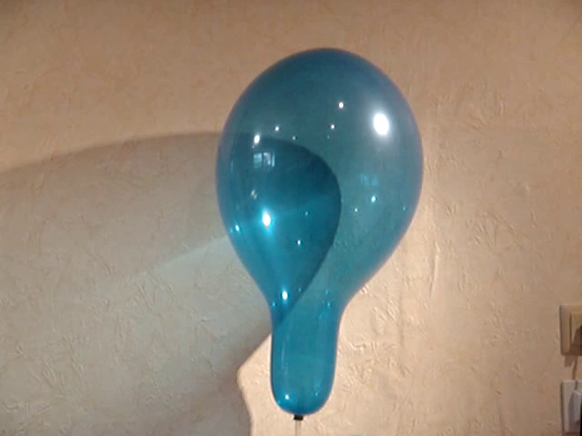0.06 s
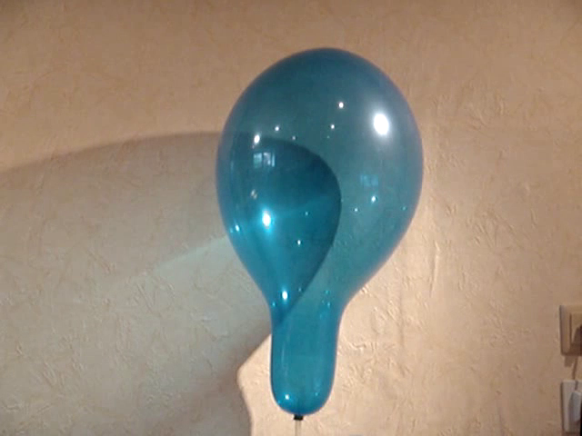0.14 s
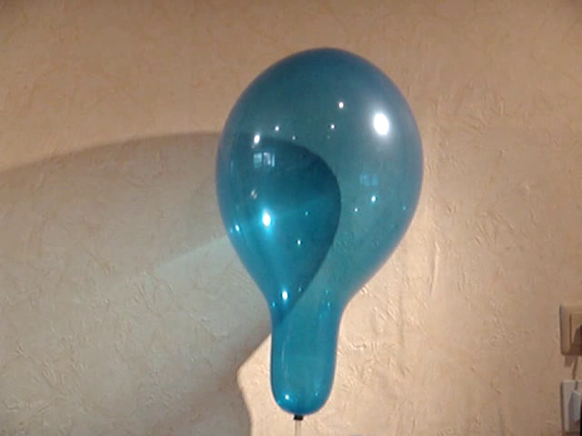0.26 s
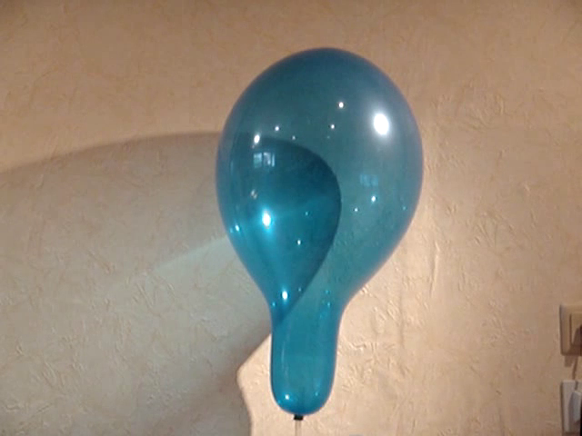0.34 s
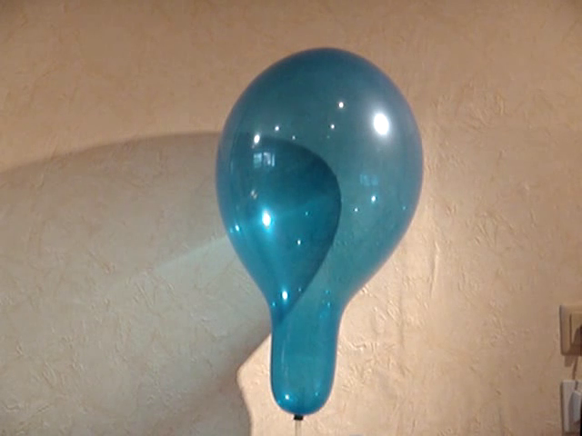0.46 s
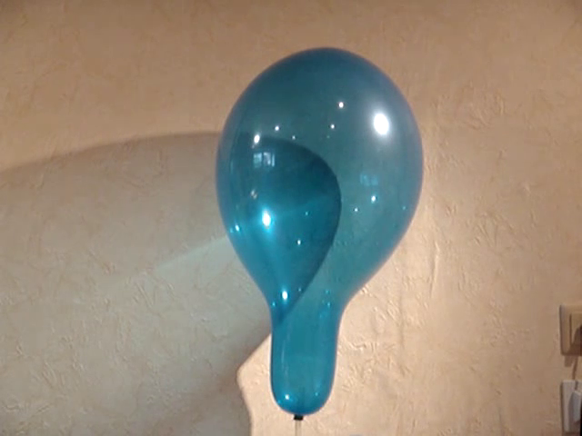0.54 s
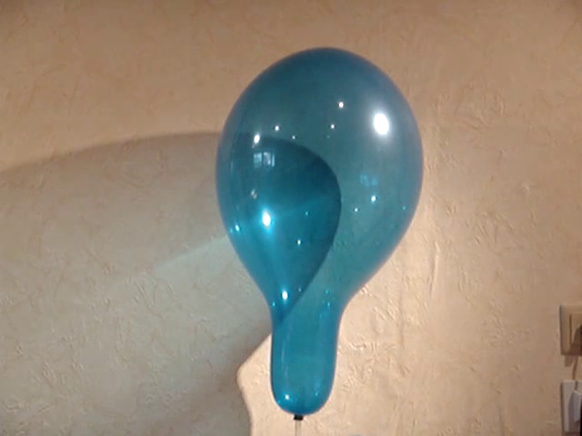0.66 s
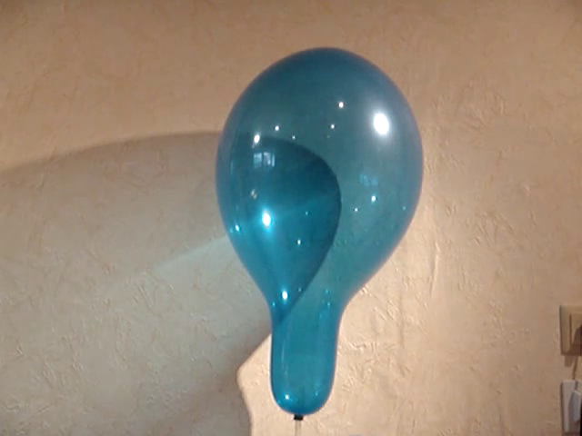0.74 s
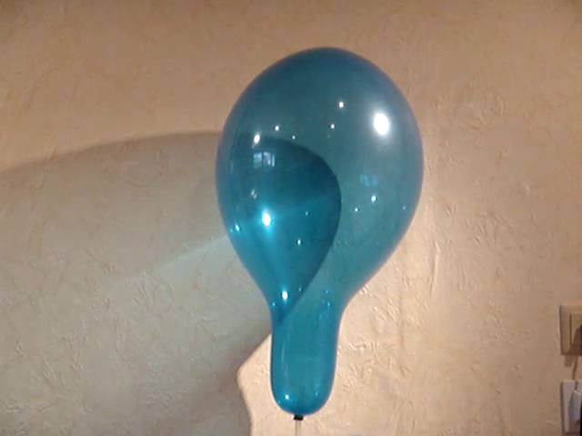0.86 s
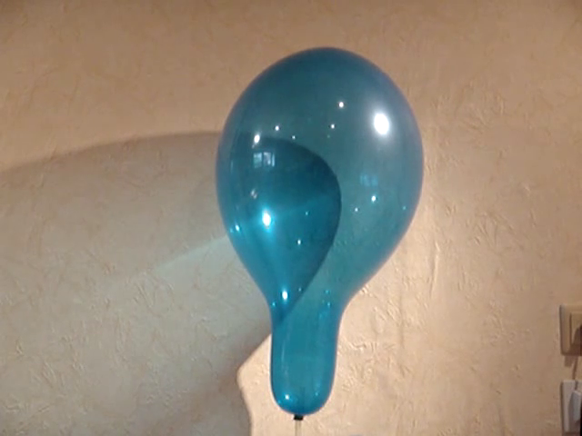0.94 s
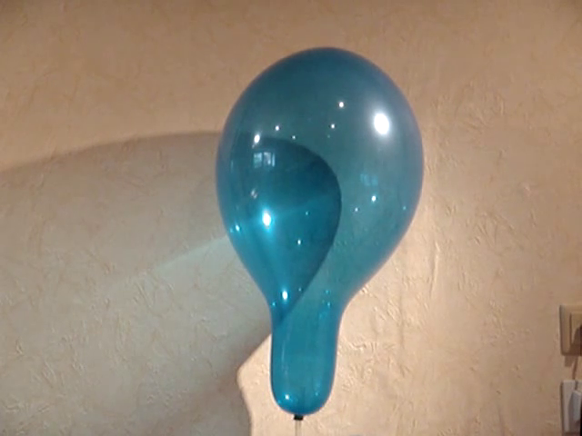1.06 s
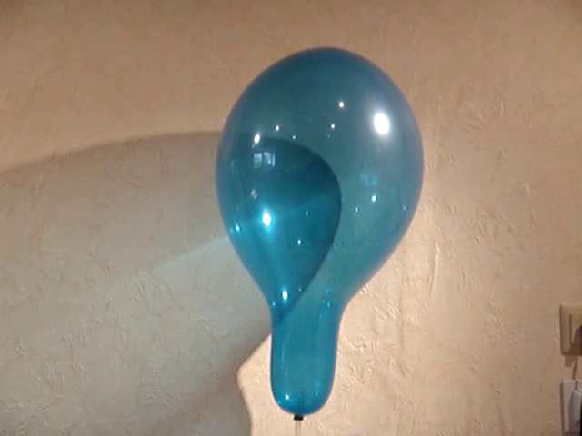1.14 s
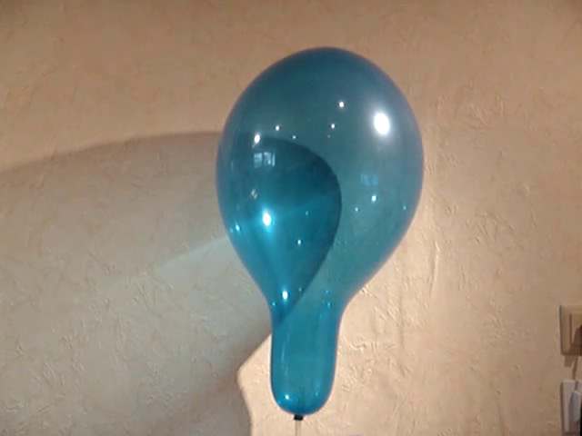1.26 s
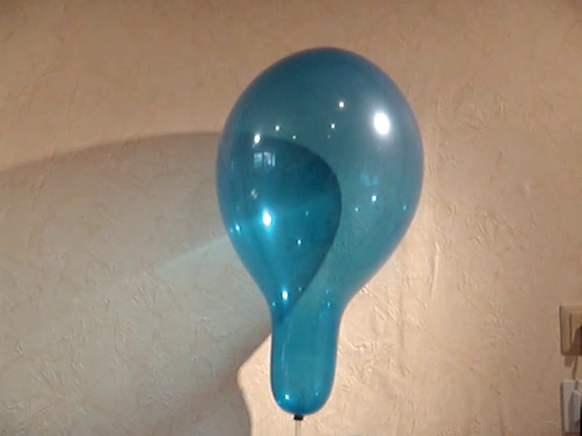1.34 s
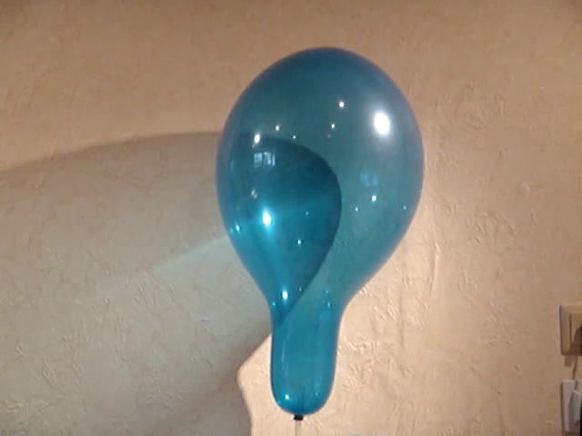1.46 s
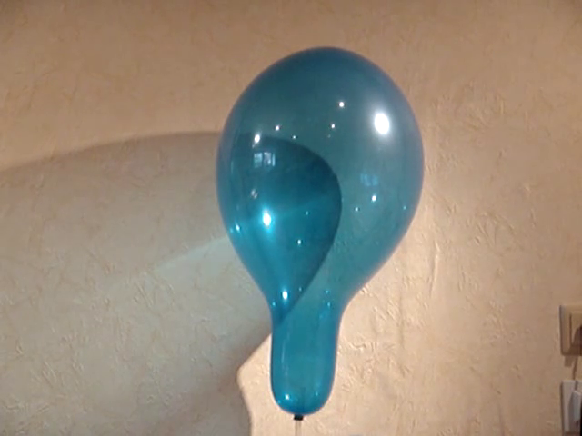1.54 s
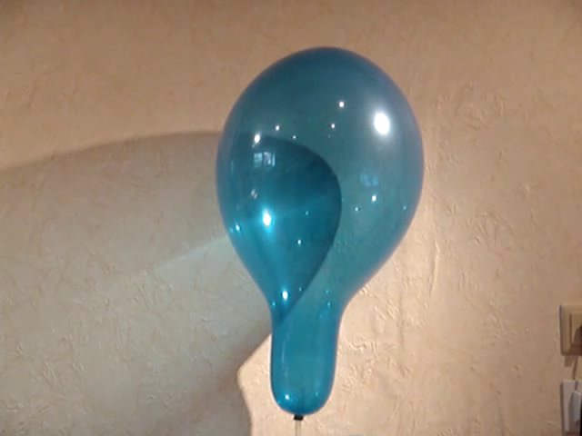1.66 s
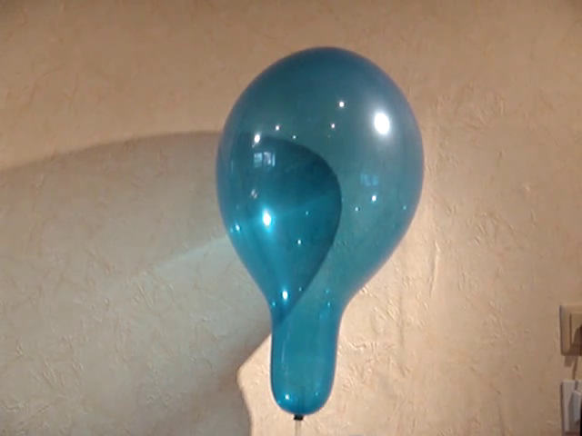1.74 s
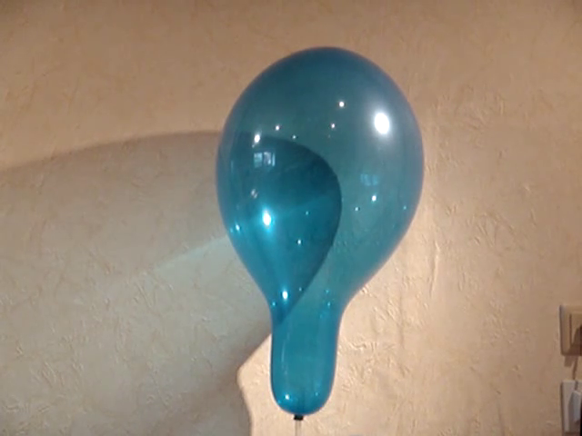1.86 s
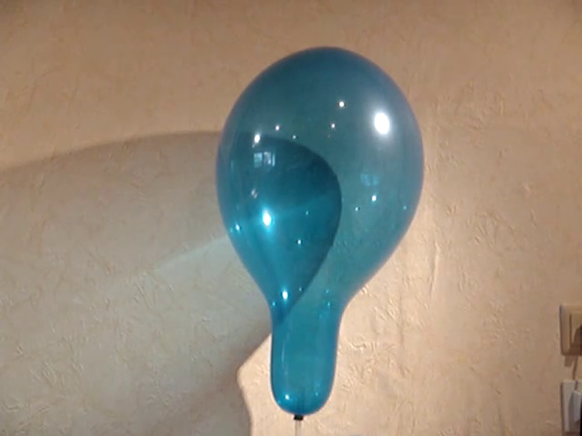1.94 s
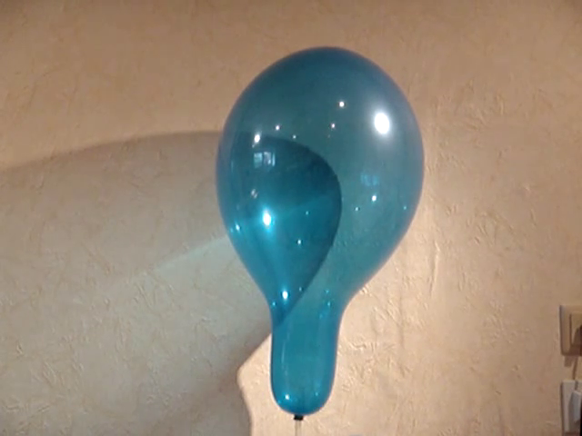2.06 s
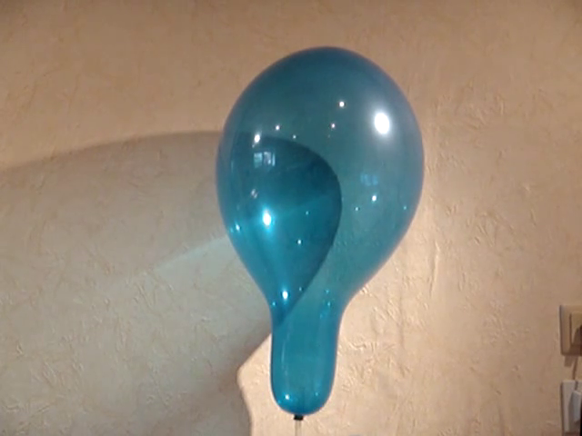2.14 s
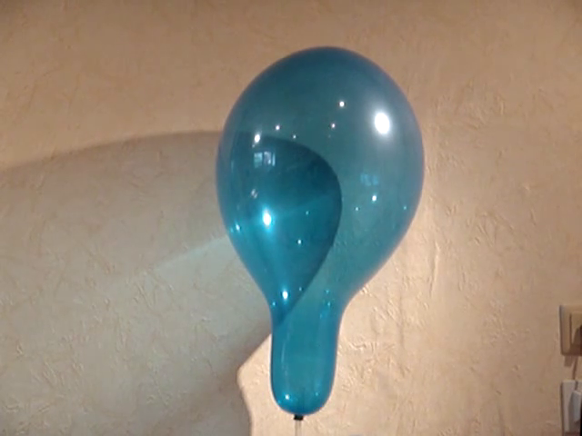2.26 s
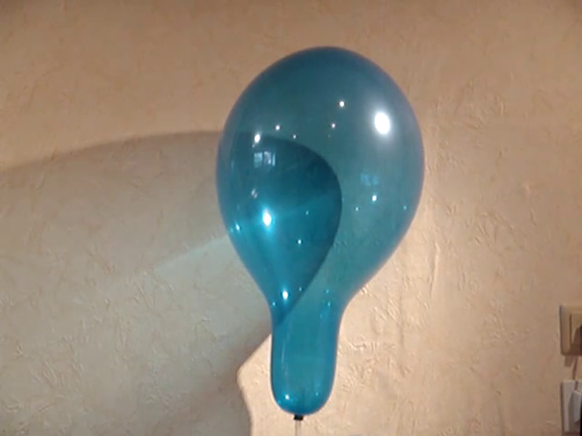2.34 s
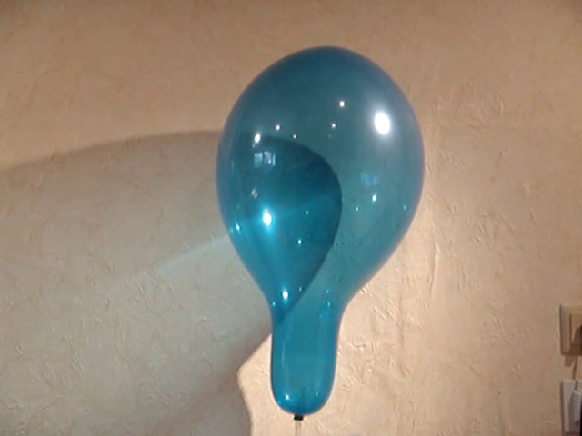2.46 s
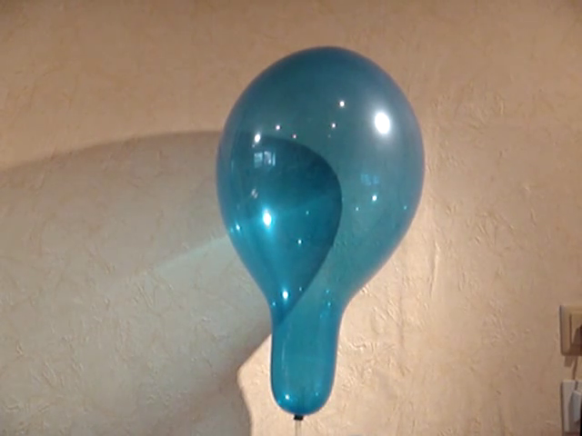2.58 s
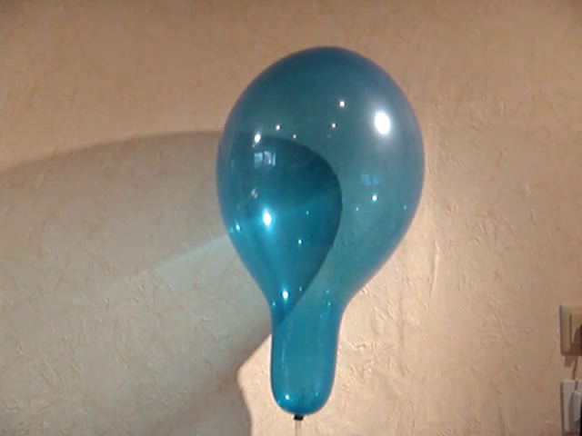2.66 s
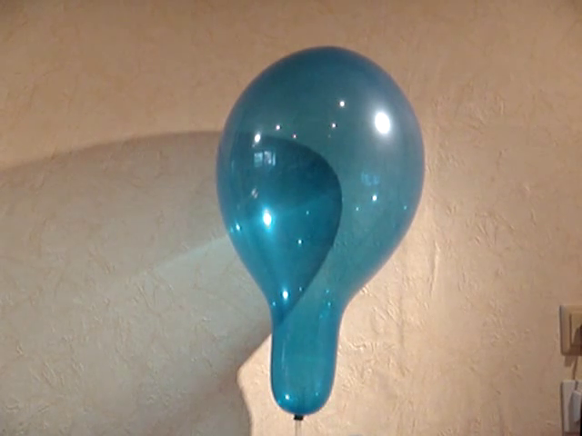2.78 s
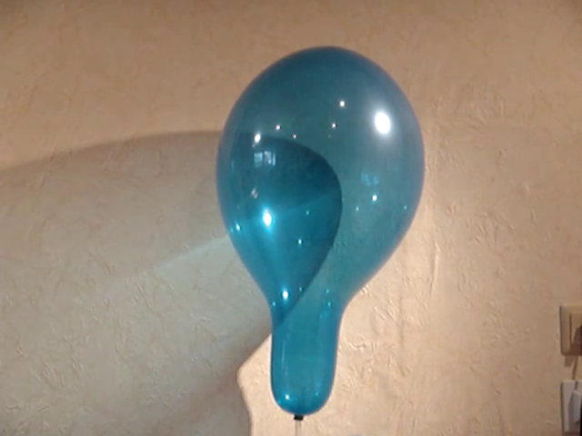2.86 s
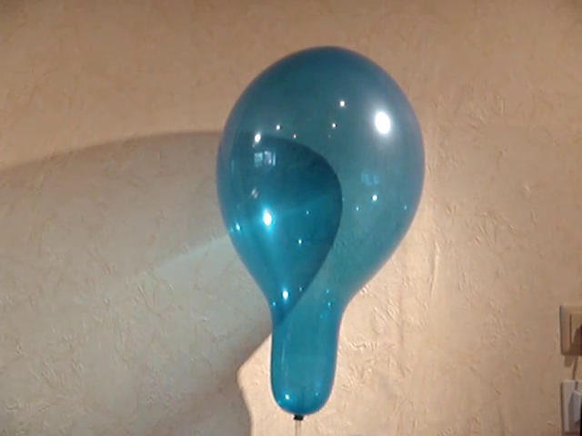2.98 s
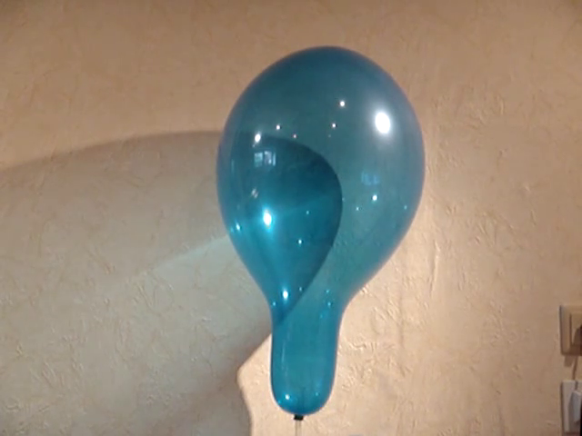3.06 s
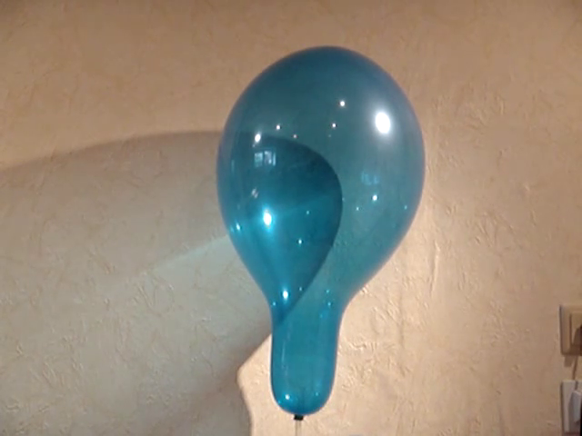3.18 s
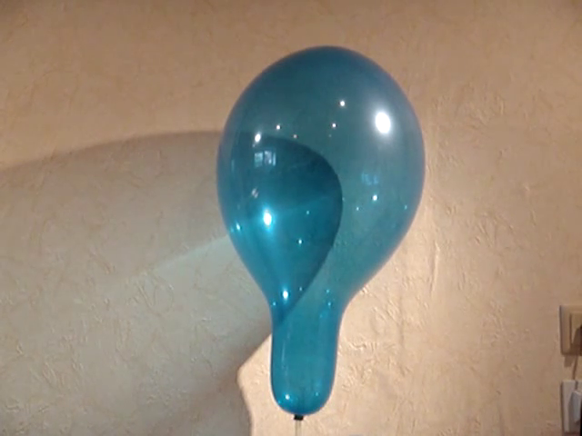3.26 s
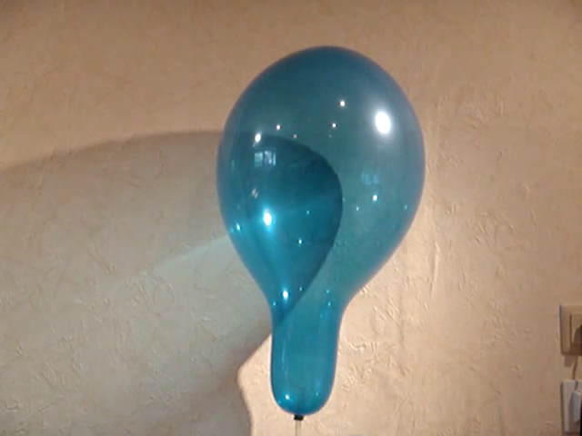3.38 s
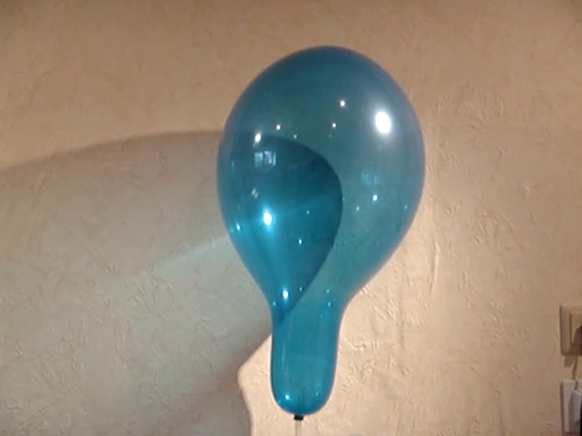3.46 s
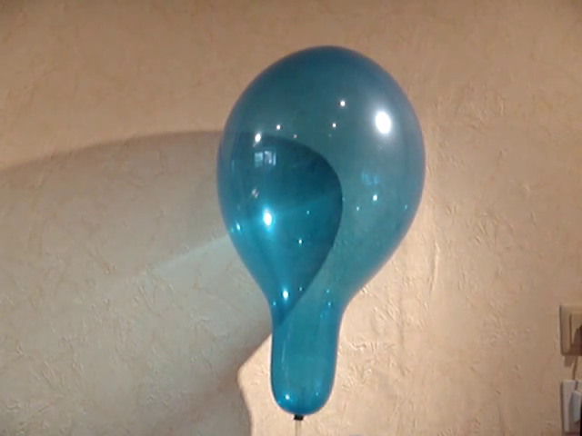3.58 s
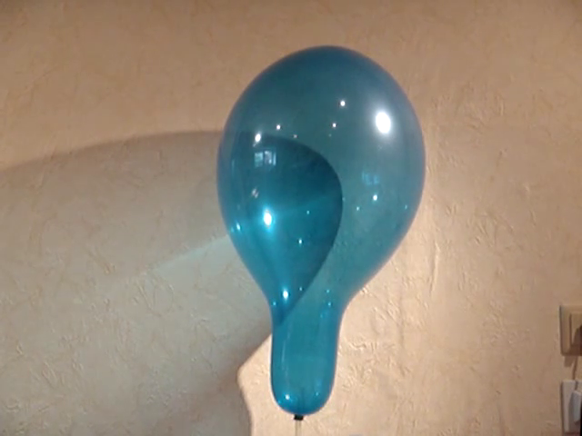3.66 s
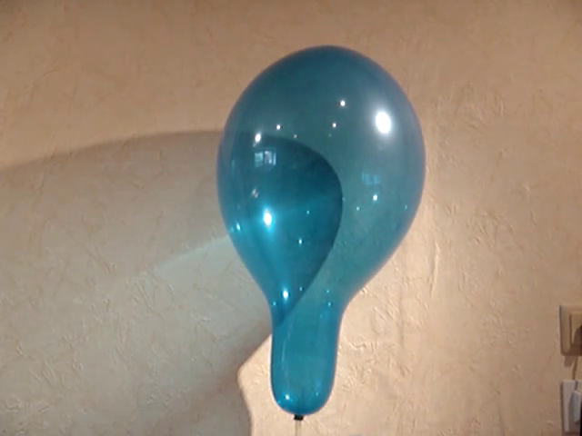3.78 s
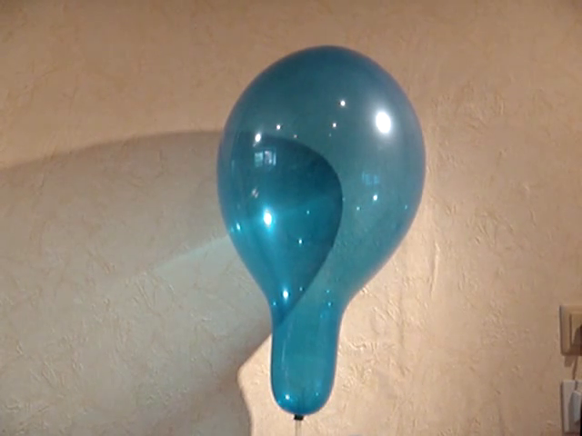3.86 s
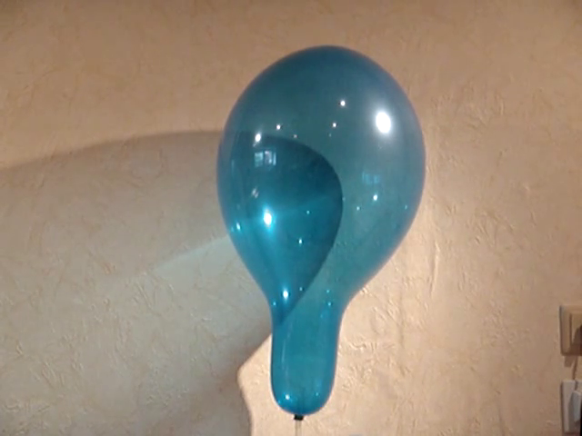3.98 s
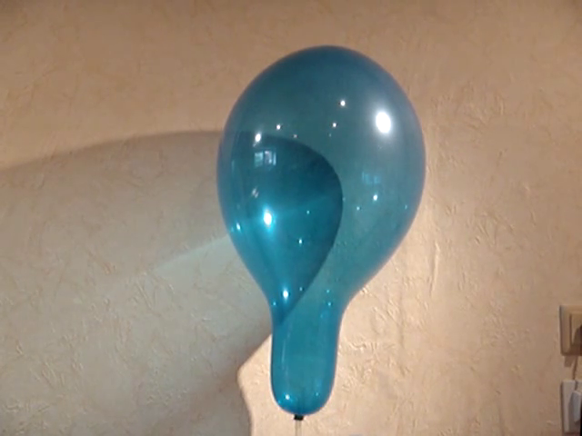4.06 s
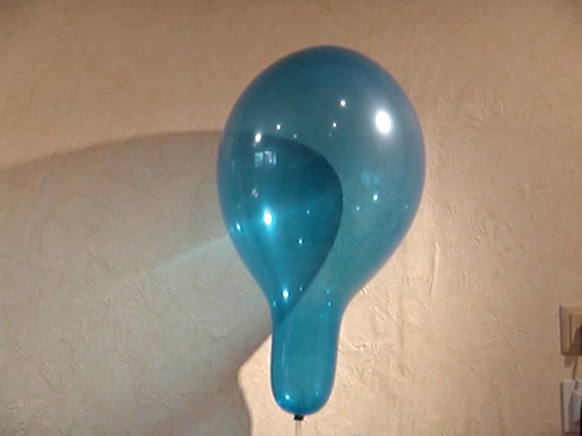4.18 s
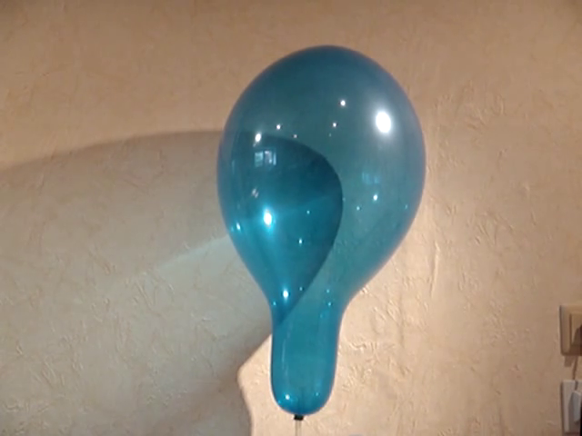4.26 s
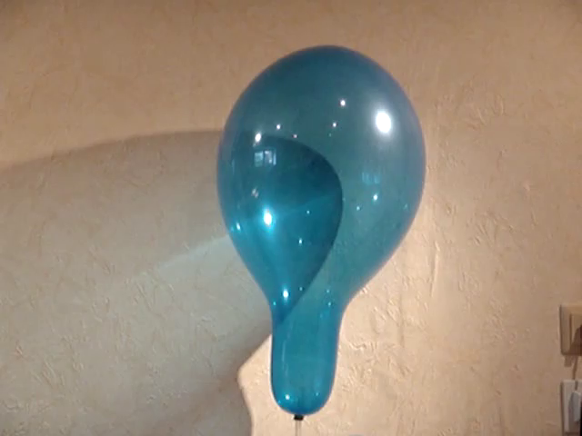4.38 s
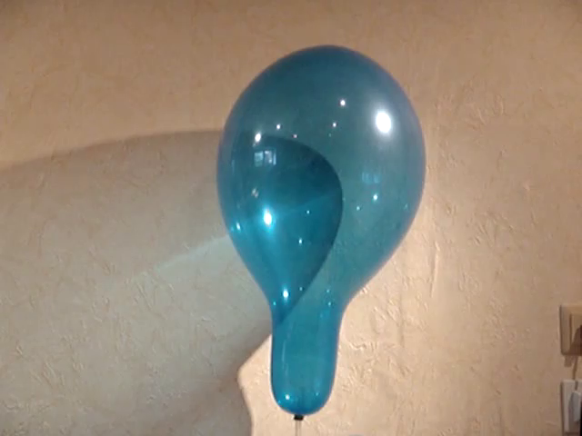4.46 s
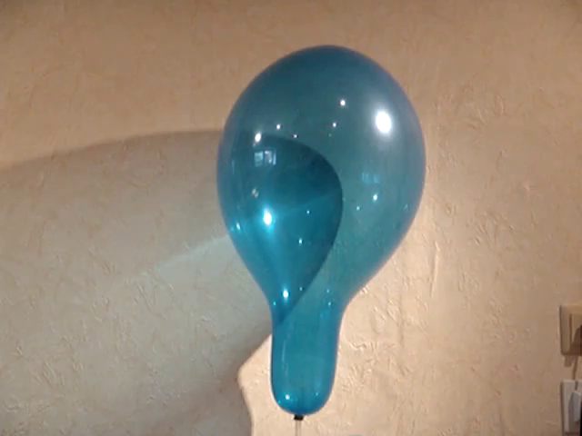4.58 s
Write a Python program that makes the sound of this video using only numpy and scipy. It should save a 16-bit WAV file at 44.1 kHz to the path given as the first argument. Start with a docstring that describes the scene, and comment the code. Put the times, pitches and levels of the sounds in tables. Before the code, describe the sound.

Steady mains-rate pump drone with pulsing air hiss, a faint rubbery rustle, one violent balloon pop ringing through the room, then a dull slap.

```python
"""A steady hum and buzz in a small bare room, a faint rustle, a loud bang that roars and dies away, then a soft slap.
A mains-driven diaphragm pump, repeated harmonics plus pulsed air noise, fills a latex balloon.
The tight skin rustles (filtered noise) and bursts: decaying noise bands, room resonances and two beating
hollow modes. A rag of rubber lands (dull noise). The camera's limiter ducks for the bang and its output clips."""
import sys
import numpy as np
from scipy import signal
from scipy.fft import rfft, irfft, next_fast_len
from scipy.io import wavfile
from scipy.ndimage import uniform_filter1d, minimum_filter1d

SR = 44100
rng = np.random.default_rng(int(sys.argv[2]) if len(sys.argv) > 2 else 0)


def wrap_up_sound(samples):
    """Save the sound to the file named by the first command line argument, as 16-bit audio."""
    columns = np.atleast_2d(samples).T
    # keep every value between -1 and 1, then stretch to whole-number steps
    tamed = np.clip(columns, -1, 1)
    steps = np.round(tamed * 32767).astype(np.int16)
    wavfile.write(sys.argv[1], SR, steps)


N = 407925
T = np.arange(N) / SR
MAINS_HZ = 50.0106  # one pump stroke per mains cycle
BURST_S = 8.4882


def undb(db):
    """Decibels to amplitude gain."""
    return 10 ** (np.asarray(db) / 20)


def spectrum_at(hz, points):
    """Gain at hz, from (frequency [Hz], level [dB]) points on a log-frequency axis."""
    point_hz, point_db = np.transpose(points)
    return undb(np.interp(np.log(hz + 1), np.log(point_hz), point_db))


def noise():
    """White noise of 0 dB per Hz."""
    return rng.standard_normal(N) * np.sqrt(SR / 2)


def colour(x, points):
    """Filter by (frequency [Hz], gain [dB]) points."""
    size = next_fast_len(N)
    gain = spectrum_at(np.fft.rfftfreq(size, 1 / SR), points)
    return irfft(rfft(x, size) * gain, size)[:N]


def walk(rate_hz):
    """Slow random drift: straight lines between normal random points."""
    hold = int(SR / rate_hz)
    steps = np.repeat(rng.standard_normal(N // hold + 1), hold)
    return uniform_filter1d(steps, hold)[:N]


def fade(age_s, t60_s):
    """Exponential decay from age 0, down 60 dB after t60_s; silent before."""
    return (age_s >= 0) * np.exp(-np.log(1000) * np.maximum(age_s, 0) / t60_s)


def ramp(start_s, length_s):
    """Linear rise from 0 to 1, then held."""
    return np.clip((T - start_s) / length_s, 0, 1)


def low_pass(x, hz):
    """Steep elliptic low-pass."""
    return signal.sosfilt(signal.ellip(10, .1, 80, hz, fs=SR, output="sos"), x)


def load(start_db, rise_db_per_s, free_db):
    """Pump gain: rises evenly in dB with back pressure, then drops once the burst takes the load off."""
    pressure_db = rise_db_per_s * np.minimum(T, BURST_S)
    unload_db = free_db * ramp(BURST_S, length_s=0.07)
    return undb(start_db + pressure_db + unload_db)


def tapping(turn, t60_s, steady):
    """Air flow through one stroke: fast-dying valve puffs over a steady part, scaled to rms 1."""
    # valve puffs: (position [share of stroke], strength [relative])
    puffs = [(.18, 0.89), (.37, 0.34), (.58, 0.52)]
    flow = steady + sum(strength * fade((turn - at) % 1 / MAINS_HZ, t60_s) for at, strength in puffs)
    return flow / np.sqrt(np.mean(flow ** 2))


def beats(order, count):
    """Quadratic phase lags that split a stroke into count equal beats."""
    return np.exp(-1j * np.pi * order ** 2 / count)


def pump(size=8192, count=204, scatter_db=3.5, jitter_strokes=0.00053, waver_db=0.38, air_db=1.0, smear_hz=1750):
    """Each stroke repeats the same harmonics of diaphragm and housing; air hisses in time with the valves."""
    # lowest harmonics of the stroke: (multiple of stroke rate, level [dB re hum_db])
    hum_lines = [(1, -29), (2, -13), (3, -23), (4, -5), (5, -0.5), (6, -9), (7, 0.5), (8, -12), (9, -23.5),
                 (10, -13), (11, -23), (12, -24), (13, -15.5), (14, -8), (15, -15), (16, -15), (17, -13.5),
                 (18, -30), (19, -18.5), (20, -12.5), (21, -10.5), (22, -14.5), (23, -20.5), (24, -19.5),
                 (25, -14), (26, -15), (27, -7), (28, -13), (29, -9.5), (30, -6.5), (31, -12.5), (32, -11),
                 (33, -21), (34, -21), (35, -17.5), (36, -15.5), (37, -16), (38, -13.5), (39, -25),
                 (40, -11.5), (41, -15.5), (42, -22), (43, -22), (44, -35)]
    hum_db = -47
    # strong housing partials before load and waver: (frequency [Hz], level [dB rms])
    housing_lines = [(2250, -66), (2998, -68.5), (3101, -65), (3300, -69), (3601, -71), (3650, -64),
                     (3752, -64), (3903, -57), (4151, -61), (4199, -63), (4253, -61), (4452, -75),
                     (4802, -73), (5399, -64.5), (7300, -65.5), (7553, -67.5)]
    # weaker buzz between them, before scatter: (frequency [Hz], partial amplitude [dB])
    buzz_points = [(2200, -74), (2600, -73.5), (3100, -71), (3450, -67), (3700, -77), (4300, -73.5),
                   (4650, -69), (5300, -71.5), (6100, -71.5), (6700, -78.5), (7400, -91), (8600, -72),
                   (10000, -82.5)]
    # air through valves and hose, before air_db and load: (frequency [Hz], density [dB per Hz])
    air_points = [(25, -101), (60, -96), (110, -92), (200, -86), (600, -89), (1600, -92), (2700, -94.5),
                  (3500, -93), (4000, -86), (4650, -89.5), (5300, -88.5), (6700, -92.5), (7600, -87.5),
                  (10000, -97)]

    turn = np.arange(size) / size
    order = np.arange(count)
    order_hz = order * MAINS_HZ
    scatter = undb(scatter_db * rng.standard_normal(count))
    partials = spectrum_at(order_hz, buzz_points) * scatter * (order > 0)
    for k, (_, db) in enumerate(hum_lines):
        partials[k + 1] = undb(hum_db + db)
    for hz, db in housing_lines:
        partials[int(round(hz / MAINS_HZ))] = np.sqrt(2) * undb(db)

    # reflections smear the timing of high partials, hardly that of long waves
    smear_rad = np.minimum((order_hz / smear_hz) ** 2, 1.2) * rng.standard_normal(count)
    partials = partials * np.exp(1j * smear_rad)

    # diaphragm thumps on push and return; housing chatters five times a stroke
    is_low = order <= 10
    swing = is_low * beats(order, count=2)
    chatter = ~is_low * beats(order, count=5)
    hum_stroke = irfft(partials * swing, size) * size / 2
    buzz_stroke = irfft(partials * chatter, size) * size / 2

    phase = (MAINS_HZ * T + jitter_strokes * walk(25)) % 1
    hum = np.interp(phase, turn, hum_stroke)
    buzz = np.interp(phase, turn, buzz_stroke)
    flow = np.interp(phase, turn, tapping(turn, t60_s=0.016, steady=0.42))
    air = colour(noise() * flow, air_points)
    rattle = (buzz + undb(air_db) * air) * undb(waver_db * walk(9))

    hum_load = load(start_db=-0.34, rise_db_per_s=0.01, free_db=-3.5)
    rattle_load = load(start_db=-1.24, rise_db_per_s=0.234, free_db=-9.5)
    return hum * hum_load + rattle * rattle_load


def skin(start_s=8.03, attack_s=0.15, gain_db=-5.5):
    """Overstretched rubber rustles faintly, as filtered noise, until it rips."""
    # rustle before gain_db: (frequency [Hz], density [dB per Hz])
    rustle_points = [(100, -100), (300, -97), (700, -99), (1200, -79), (2300, -85), (3000, -84),
                     (9000, -100)]
    return colour(noise(), rustle_points) * undb(gain_db) * ramp(start_s, attack_s) * (T < BURST_S)


def rag(land_s=9.225, press_s=0.0061, t60_s=0.48):
    """A rag of rubber lands: a soft, dull noise slap with the room's decay behind it."""
    # slap before its envelope: (frequency [Hz], density [dB per Hz])
    slap_points = [(30, -98), (100, -68), (250, -65), (700, -64), (1300, -73), (2300, -72), (3200, -79),
                   (9000, -85)]
    age_s = T - land_s
    return colour(noise(), slap_points) * np.clip(age_s / press_s, 0, 1) * fade(age_s, t60_s)


def hollow(age_s, gain_db=-6.5, t60_s=1.26):
    """Something hollow rings on: two close modes beat slowly."""
    modes = sum(np.sin(2 * np.pi * hz * age_s) for hz in (254.3, 256.45))
    return undb(gain_db) * fade(age_s, t60_s) * modes


def burst(build_cycles=10, first_share=0.68):
    """The skin rips in an instant: dense echoes fill the room, each band dying at its own rate."""
    # bang in the room before build-up and decay: (band centre [Hz], density [dB per Hz], t60 [s])
    bang_bands = [(30, -59, .8), (100, -50, 0.6), (190, -17.5, 0.42), (357, -11, 0.46), (506, -6.5, 0.51),
                  (643, -7.5, 0.6), (910, -8, 0.56), (1150, -16, 0.7), (2310, -17.5, 0.72),
                  (2970, -18, 0.56), (3800, -17.5, 0.4), (4730, -18.5, 0.51), (7700, -20.5, 0.46),
                  (10400, -27.5, 0.4)]
    # room resonances set ringing: (frequency [Hz], starting amplitude [dB], t60 [s])
    room_modes = [(276, 5, 0.41), (455, 4, 0.6), (502, 10, 0.33), (543.4, 9.5, 0.62), (638, 7.5, 0.7),
                  (661, 5, 0.66), (760, 5, 0.49), (798, 5, 0.58), (1098, 3.5, 0.72)]

    age_s = T[T >= BURST_S] - BURST_S
    size = next_fast_len(len(age_s))
    echoes = rfft(noise()[:size])
    log_hz = np.log(np.fft.rfftfreq(size, 1 / SR) + 1)
    log_centres = np.log(np.array(bang_bands)[:, 0])
    room = 0
    for one_band, (hz, db, t60_s) in zip(np.eye(len(bang_bands)), bang_bands):
        share = np.interp(log_hz, log_centres, one_band)
        band_noise = irfft(echoes * share, size)[:len(age_s)]
        # the room needs some cycles to fill, so the boom swells after the crack
        build = 1 - (1 - first_share) * np.exp(-age_s * hz / (np.pi * build_cycles))
        room = room + undb(db) * build * fade(age_s, t60_s) * band_noise

    rings = 0
    for hz, db, t60_s in room_modes:
        wave = np.cos(2 * np.pi * (hz * age_s + rng.random()))
        rings = rings + undb(db) * fade(age_s, t60_s) * wave
    return np.pad(room + rings + hollow(age_s), (N - len(age_s), 0))


def scene():
    """Pump and balloon, summed at one microphone."""
    return (pump() + skin() + rag() + burst())[None]


def limiter(x, top_db, ratio, ahead_s=0.027, window_s=0.0077):
    """Gain falls with level above a threshold, a moment before the loud sound arrives."""
    window, half_ahead = int(window_s * SR), int(ahead_s * SR / 2)
    power = uniform_filter1d(x ** 2, window)
    level = np.sqrt(np.maximum(power, undb(top_db) ** 2))
    gain = (undb(top_db) / level) ** (1 - 1 / ratio)
    # lowest gain over the coming ahead_s
    held = minimum_filter1d(gain, 2 * half_ahead + 1, origin=-half_ahead)
    return x * uniform_filter1d(held, window)


def record(dry):
    """The camera limits, cuts the treble and clips at full scale, which spills a little treble back."""
    band_hz, top_hz = 10000, 16000
    limited = limiter(dry[0], top_db=-12, ratio=2.76)
    clipped = np.clip(low_pass(limited, band_hz), -1, 1)
    return low_pass(clipped, top_hz)[None]


dry = scene()
out = record(dry)
wrap_up_sound(out)
```